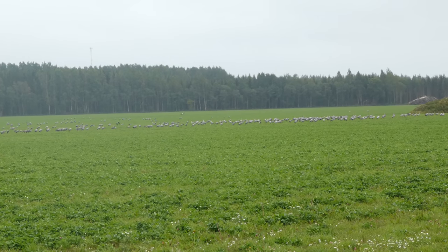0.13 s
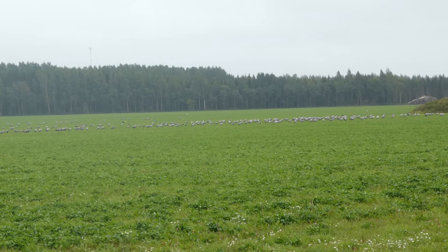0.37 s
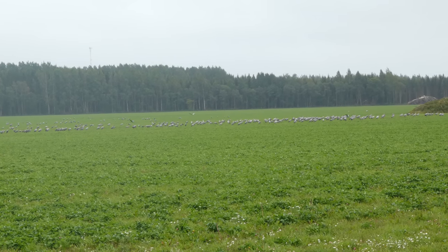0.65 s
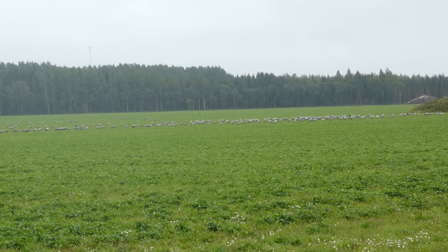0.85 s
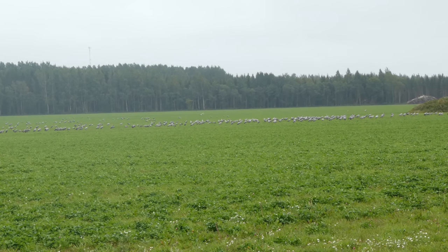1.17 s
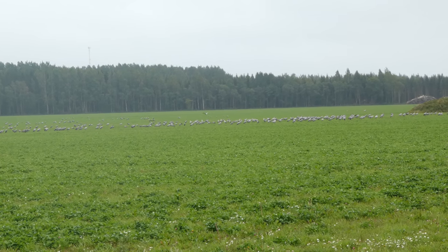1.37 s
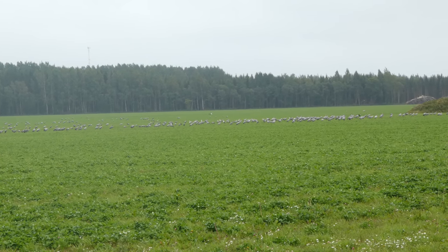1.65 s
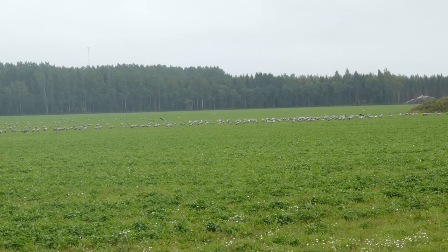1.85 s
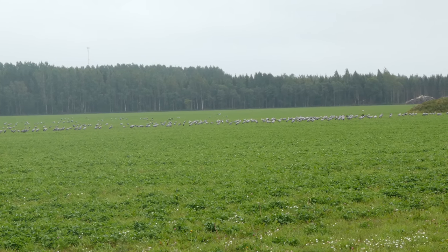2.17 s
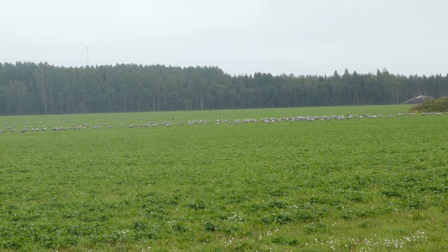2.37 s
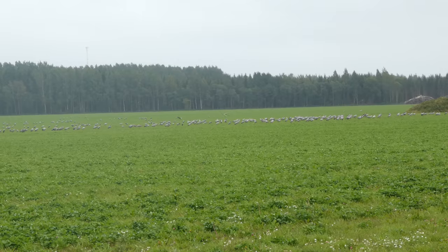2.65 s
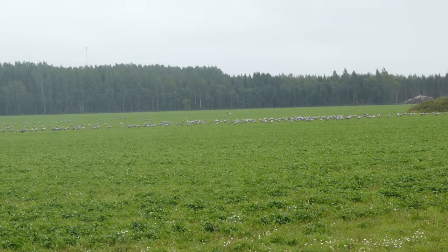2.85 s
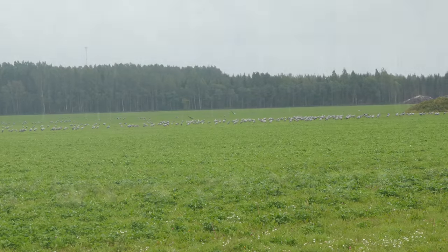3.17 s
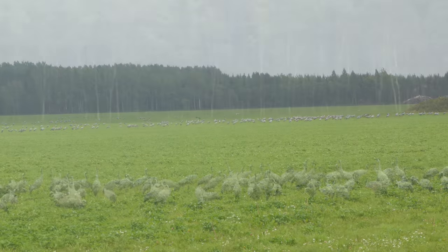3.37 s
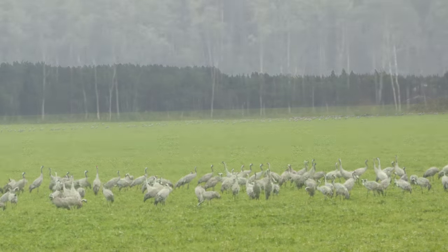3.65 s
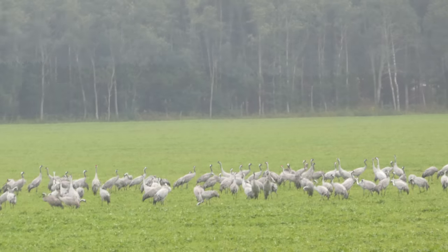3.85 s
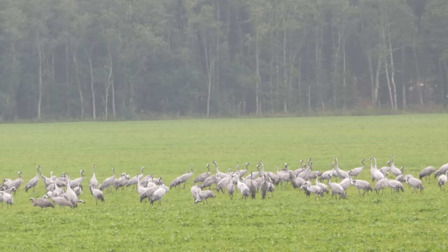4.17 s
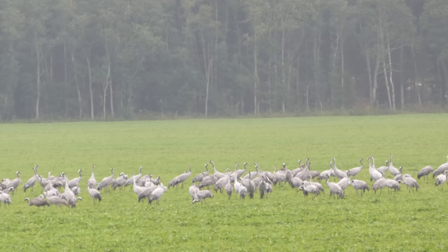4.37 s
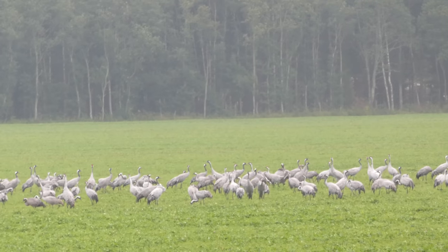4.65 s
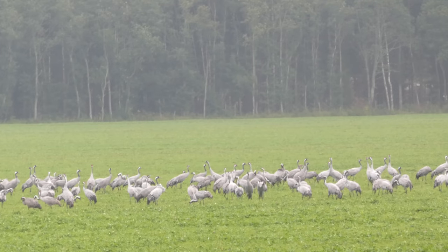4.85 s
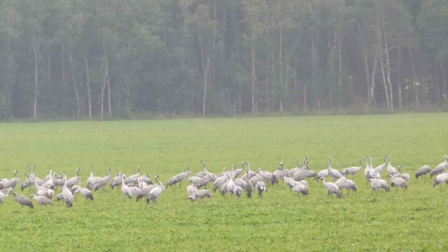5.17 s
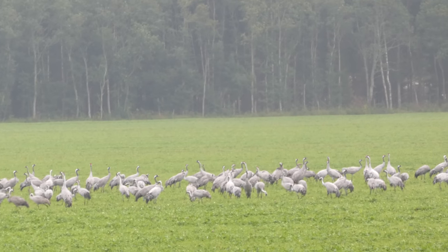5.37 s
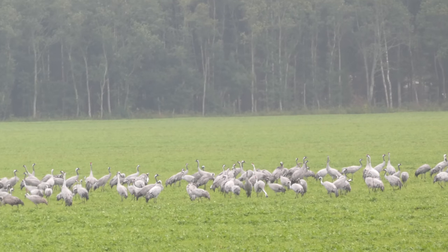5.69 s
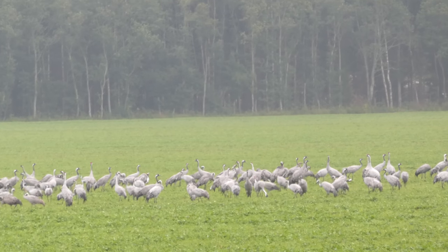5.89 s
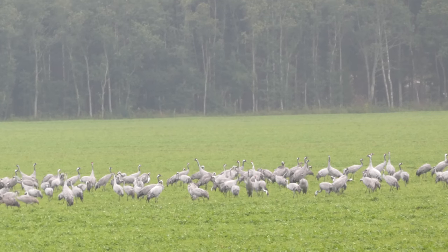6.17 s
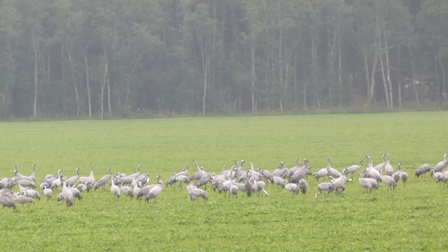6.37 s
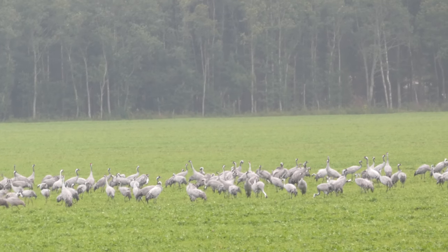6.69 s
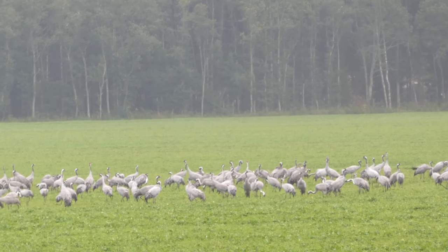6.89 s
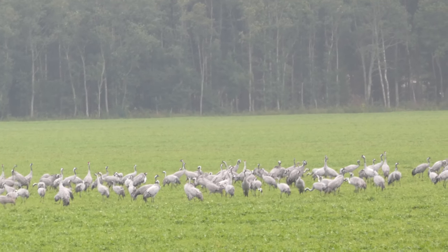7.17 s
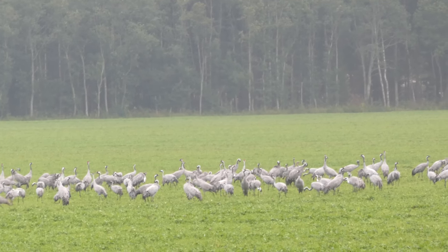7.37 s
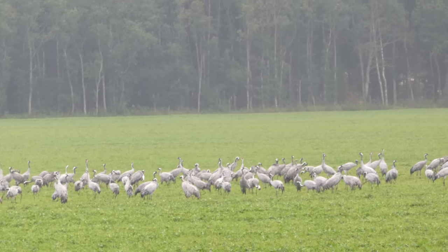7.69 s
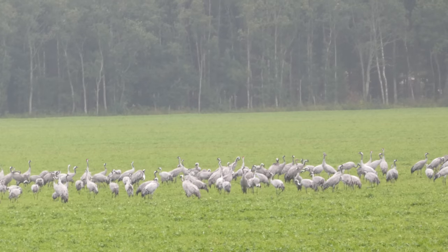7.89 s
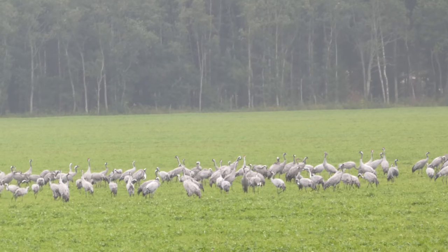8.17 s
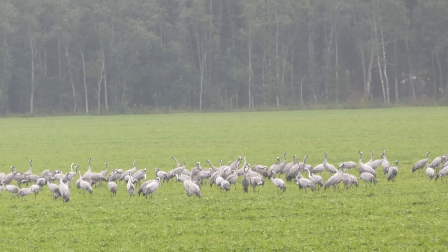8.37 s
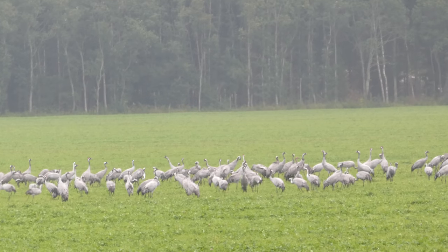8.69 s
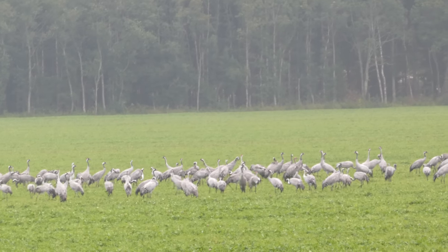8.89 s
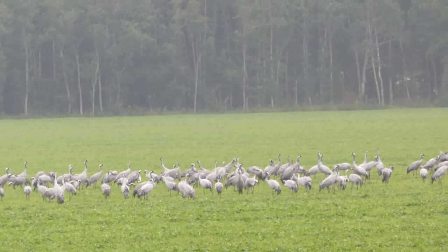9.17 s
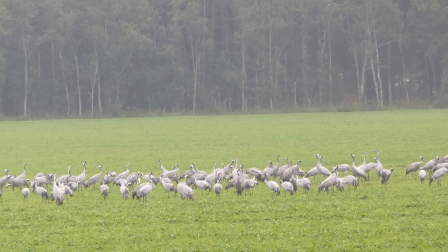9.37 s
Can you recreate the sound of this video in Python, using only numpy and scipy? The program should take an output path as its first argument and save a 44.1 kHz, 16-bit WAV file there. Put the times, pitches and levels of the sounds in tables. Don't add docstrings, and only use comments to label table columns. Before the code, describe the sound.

A large crane flock calls throughout in an open field, with hoarse distant voices merging into a murmur that rises and falls in waves, and a soft forest echo behind. From about 0.5 to 1.8 seconds nearby adults roll loudly, around 21 beats a second near 1 kHz, with hollow knocks near 0.7 and a bright trumpet call at 1.7. A rattle opens into calls around 2.3 to 3, with a high juvenile whistle at 2.6. Low wind thumps hit the microphone from 2.5 and are heaviest from 3.4 to 4.9, partly covering softer honks. Nasal and brassy calls cluster at 5.2 to 6, with a pure trumpet note at 6 and chirps to 6.5. Light gusts return at 6.6 and intermittently afterwards. Scattered rasping, round calls and thin whistles continue, including rolls at 8.4 and a strong ringing bugle near 9.1, over steady faint hiss until the end.

```python
import sys
import numpy as np
from scipy import signal
from scipy.fft import rfft, irfft, next_fast_len
from scipy.io import wavfile
from scipy.ndimage import uniform_filter1d, map_coordinates

SR = 44100
rng = np.random.default_rng(int(sys.argv[2]) if len(sys.argv) > 2 else 0)


def log_audio(samples):
    frames = np.atleast_2d(samples).T
    limited = np.clip(frames, -1, 1)
    pcm = np.round(limited * 32767).astype(np.int16)
    wavfile.write(sys.argv[1], SR, pcm)


def attenuation_scalar(level_db):
    decades = np.asarray(level_db, float) / 20
    return 10 ** decades


N = 420713


def unit(x):
    return x / np.sqrt(np.mean(x ** 2) + 1e-20)


def along(points, hz):
    f, value = np.transpose(points)
    return np.interp(np.log(hz + 1), np.log(f + 1), value)


def wobble(rate, size, order=3):
    knots = rng.standard_normal(int(size * rate / SR) + 4)
    return map_coordinates(knots, [np.arange(size) * rate / SR], order=order)


def noise(spectrum, channels):
    m = next_fast_len(N)
    gain = attenuation_scalar(along(spectrum, np.fft.rfftfreq(m, 1 / SR)))
    white = rng.standard_normal((channels, m))
    return unit(irfft(rfft(white) * gain, m)[:, :N])


def add(track, s, x):
    part = track[..., round(s * SR):round(s * SR) + x.shape[-1]]
    part += x[..., :part.shape[-1]]


def placed(x, pan_db):
    return x * attenuation_scalar([[pan_db / 2], [-pan_db / 2]])


# [f/Hz, level/dB per Hz]
HISS = [(59, -16), (100, -6.5), (333, -5), (696, -8), (860, 1), (1620, -2.5), (1800, -9), (4180, -11),
        (5390, -19), (10400, -18.5), (15500, -29)]
# [f/Hz, level/dB]
HISS_SIDE = [(100, -0.5), (300, -0.5), (1000, -10.5), (4000, -17), (8000, -18.5), (15000, -14)]


def hiss():
    mid = noise(HISS, channels=1)[0]
    side = noise([(hz, db + along(HISS_SIDE, hz)) for hz, db in HISS], channels=1)[0]
    sag_db = -2.5 * np.exp(-((np.arange(N) / SR - 3.5) / 0.31) ** 2)
    return attenuation_scalar(-61.0 + sag_db) * (mid + attenuation_scalar(3.0) * side * [[1], [-1]])


# [t/s, length/s, peak level/dB]
GUSTS = [(0.774, .1, -49), (1.09, .13, -52), (3.345, .02, -50), (2.41, .03, -50), (5.302, .25, -58.5),
         (6.2, .15, -58), (6.7, .1, -49.5), (6.89, .06, -47), (7.27, .06, -50.5), (7.75, .08, -56),
         (8.071, .04, -45), (8.46, .08, -46), (9.0, .12, -57), (9.349, .08, -52), (5.6, .2, -63)]
EDDY_S, EDDY_HZ = 0.055, 120
EDDY_SCATTER_DB, EDDY_CORE_DB = 4, -31


def eddies():
    shed = []
    for s, length, db in GUSTS:
        for k in range(1 + int(length / EDDY_S)):
            level_db = db - EDDY_SCATTER_DB * rng.exponential()
            shed.append((s + EDDY_S * k, level_db, EDDY_HZ * rng.uniform(0.64, 1.45), EDDY_CORE_DB))
    return shed


# [centre t/s, peak level/dB, f/Hz, sharp core level/dB]
PUFFS = [(1.051, -43, 165, -27), (2.473, -37.5, 174, -24), (2.512, -28.5, 124, -29), (2.555, -35, 194, -25),
         (2.586, -51, 182, -14), (2.637, -30.5, 148, -19), (2.698, -36.5, 164, -17), (2.804, -41, 140, -16),
         (3.417, -37.1, 170, -16), (3.461, -32, 203, -11), (3.501, -41, 129, -25), (3.607, -43.5, 149, -15),
         (3.633, -33.5, 160, -23), (3.665, -50, 146, -15), (3.809, -33, 132, -10), (3.838, -44.2, 182, -12),
         (3.867, -32.6, 167, -28), (3.903, -43, 172, -20), (3.939, -34.5, 133, -22), (3.976, -31, 175, -12),
         (4.001, -22.5, 171, -14), (4.027, -34, 170, -17), (4.051, -38, 149, -19), (4.11, -40, 128, -21),
         (4.145, -37.5, 149, -20), (4.17, -39, 178, -22), (4.192, -52, 149, -18), (4.228, -28, 188, -4),
         (4.285, -31, 161, -18), (4.313, -35, 152, -23), (4.371, -47, 172, -17), (4.394, -30.5, 190, -25),
         (4.419, -41.6, 149, -11), (4.447, -28.5, 181, 0.5), (4.52, -34, 162, -12),
         (4.682, -41.5, 154, -17), (4.768, -42.5, 132, -16), (4.81, -34, 139, -24),
         (4.838, -44.0, 119, -19), (4.868, -41, 137, -24), (4.959, -46.5, 122, -16), (6.474, -48, 118, -23),
         (6.605, -44, 163, -23), (6.642, -32, 161, -26), (6.818, -50, 128, -15), (6.856, -41.5, 136, -23),
         (7.238, -43, 127, -20), (7.444, -45.5, 140, -18), (8.348, -39, 130, -29)]
# [f/Hz, level/dB per Hz]
RUMBLE = [(25, -23), (45, -38), (70, -3), (130, 1), (220, -4), (400, -17.5), (800, -71)]
CALM_LUMPS = 0.4


def wind():
    thumps, force = np.zeros((2, N)), np.zeros(N)
    t = np.arange(-SR // 12, SR // 12) / SR
    for s, db, hz, core_db in list(PUFFS) + eddies():
        turn = rng.uniform(0, 2 * np.pi) + rng.normal(0, 0.52, (2, 2, 1))
        body = np.exp(-(t * hz / 0.77) ** 2) * np.sin(2 * np.pi * hz * t + turn[0])
        core = np.exp(-(t / 0.0021) ** 2) * np.sin(2 * np.pi * 470 * t + 3 * turn[1])
        puff = attenuation_scalar(db) * (body + attenuation_scalar(core_db + 0.5) * core)
        add(thumps, s + t[0], placed(puff, rng.normal(1.0, 1)))
        add(force, s + t[0], attenuation_scalar(db) * np.exp(-(t / 0.036) ** 2))
    shared, *own = noise(RUMBLE, channels=3)
    air = unit(shared + .5 * np.array(own))
    lumps = attenuation_scalar(6.4 * wobble(25, N))
    calm = attenuation_scalar(-78.5 + 0.71 * wobble(8.1, N))
    return thumps + (attenuation_scalar(-14.5) * force * unit(lumps) + calm * unit(lumps ** CALM_LUMPS)) * air


# [f/Hz, t60/s]
FOREST = [(600, 0.43), (2500, 0.18), (7000, 0.29)]


def forest(x):
    hz, t, z = signal.stft(rng.standard_normal((2, SR * 3 // 4)), SR, nperseg=256)
    decay = attenuation_scalar(-60 * t / along(FOREST, hz)[:, None])
    tail = signal.istft(z * decay, SR, nperseg=256)[1]
    late = np.pad(x.mean(0), (500, 0))[None]
    return signal.fftconvolve(late, tail / np.linalg.norm(tail[0]), axes=1)[:, :N]


def rolled(size, rate, depth_db):
    turns = np.cumsum(rate * (1 + 0.0916 * wobble(12.2, size))) / SR
    beat = (turns + rng.random()) % 1
    fall = attenuation_scalar(depth_db * (0.88 - beat))
    opening = attenuation_scalar(-depth_db * np.clip(1 - beat / 0.072, 0, 1))
    return beat, fall * opening


def throat(hz, gain, overtones_db, rough):
    size = len(hz)
    jitter = (0.0027 + 0.01168 * rough) * wobble(90.5, size)
    phase = 2 * np.pi * np.cumsum(hz * (1 + jitter)) / SR + 2 * np.pi * rng.random()
    gain = np.sqrt(2) * gain * attenuation_scalar((1.19 + 3.1 * min(rough, .3)) * wobble(41.7, size))
    parts = []
    for k, db in enumerate((0, *overtones_db), start=1):
        share = np.clip(rough * (.35 * k - .1), 0, 1)
        flutter = np.sqrt(1 - share) + np.sqrt(share) * wobble(130 + 110 * k, size, order=1)
        parts.append(attenuation_scalar(db) * flutter * np.sin(k * phase + k * k))
    return gain * np.array([parts[0], parts[1], sum(parts[2:])])


# [t/s, length/s, level/dB, higher harmonics re level/dB]
WAVES = [(0, 0.017, -59, 2.5), (0.468, .14, -66.5, 17), (0.61, 0.18, -47.5, -11),
         (0.834, 0.69, -57.5, -1.5), (1.19, 0.18, -55, -1), (1.477, 0.14, -51.5, -5),
         (1.74, 0.28, -56.5, -2), (2.245, 0.24, -50, -5), (2.703, 0.35, -69, 7.5), (3.18, 0.34, -56.5, -5),
         (3.688, 0.53, -54, -8), (4.197, 0.15, -56.5, -1.5), (4.44, 0.2, -53.5, -9),
         (4.86, .48, -55.5, -3.5), (5.567, 0.48, -52.5, -6), (6.21, 0.5, -55.5, -2.5),
         (6.55, 0.46, -64.5, -17), (6.782, 0.75, -52, -5), (7.473, 0.72, -56.5, -2.5),
         (7.8, 0.2, -53.5, -8), (8.35, 0.24, -55.5, -6), (8.856, 0.22, -51, -7.5), (9.15, 0.2, -53.5, -6.5),
         (9.48, .2, -50, -5)]
WAVE_RISE_DB_PER_S, WAVE_FALL_DB_PER_S, LULL_DB = 112, 138, -73


def waves():
    t = np.arange(0, N / SR + .01, .005)
    s, length, db, rasp_db = np.transpose(WAVES)[..., None]
    before_db = WAVE_RISE_DB_PER_S * np.maximum(s - t, 0)
    after_db = WAVE_FALL_DB_PER_S * np.maximum(t - s - length, 0)
    power = attenuation_scalar(2 * (db - before_db - after_db))
    total = power.sum(0) + attenuation_scalar(2 * LULL_DB)
    now = np.arange(N) / SR
    level_db = np.interp(now, t, 10 * np.log10(total))
    return level_db, np.interp(now, t, (power * rasp_db).sum(0) / total)


WINDPIPE = [-4, -1.5, -4, -7.5, -14.5]


def murmur(count=250):
    layers = np.zeros((3, 2, N))
    for turn, (when, length, pitch, size, roll, pan) in enumerate(rng.random((count, 6))):
        u = np.linspace(0, 1, round(SR * (.1 + .22 * length)))
        beat, flap = rolled(len(u), 18 + 9 * pan, depth_db=4 + 13 * roll ** 2)
        arch = .02 * np.sin(np.pi * u) - 0.05334 * u ** 4
        snap = 0.0602 * roll * np.exp(-beat / 0.2507)
        hz = (770 + 400 * pitch ** 1.3) * (1 + arch + snap)
        gain = np.sin(np.pi * u) ** 0.027 * attenuation_scalar(4.3 * size) * flap
        overtones_db = WINDPIPE + rng.normal(0, 3, len(WINDPIPE))
        voice = throat(hz, gain, overtones_db, rough=.33 + .65 * roll ** 2)
        start = (turn + 2 * when) / count * N / SR * (count / (count + 1))
        add(layers, start, voice[:, None] * attenuation_scalar(8.9 * (pan - 0.56) * np.array([[1], [-1]])))
    level_db, rasp_db = waves()
    power = uniform_filter1d(np.mean(layers ** 2, 1), SR // 8)
    low, second, rasp = layers / np.sqrt(np.abs(power) + 1e-2)[:, None]
    return attenuation_scalar(level_db) * (low + attenuation_scalar(-3.5 + 0.2 * rasp_db) * second + attenuation_scalar(rasp_db) * rasp)


def sung(notes, fade):
    out = np.zeros((2, N))
    for rough, overtones_db, rows in notes:
        s, hz, db = np.transpose(rows)
        t = np.arange(max(s[0] - fade, 0), s[-1] + fade, 1 / SR)
        edge = np.clip(np.minimum(t - t[0], t[-1] - t) / (1.05 * fade), 0, 1) ** 2
        edge = edge * rolled(len(t), 22, depth_db=25.0 * max(rough - .2, 0))[1]
        pitch = uniform_filter1d(np.interp(t, s, hz), SR // 50, mode="nearest")
        gain = edge * attenuation_scalar(np.interp(t, s, db))
        voice = throat(pitch, gain, overtones_db, np.clip(rough, 0, 1))
        add(out, t[0], placed(voice.sum(0), rng.normal(-.4, 1.2)))
    return out


# [t/s, length/s, first f/Hz, crest f/Hz, last f/Hz]
NEAR_YOUNG = [
    (2.62, 0.3, 3070, 4180, 3300),
    (6.355, 0.1, 4050, 4760, 4790),
    (6.505, 0.03, 4860, 4870, 4700),
    (6.02, 0.09, 4850, 4870, 4700),
    (4.02, .045, 4800, 4870, 4830),
]
FAR_YOUNG = [
    (3.61, .125, 3980, 3990, 3450),
    (3.43, .05, 3200, 3500, 3490),
    (5.21, .17, 4270, 5020, 4620),
    (7.635, .205, 3700, 4980, 3850),
    (2.33, .035, 5250, 5500, 5450),
    (8.96, .24, 4850, 5150, 4900),
    (8.964, 0.075, 5650, 5880, 5870),
]
FAINT_YOUNG = [
    (.2, .16, 4100, 4550, 4540),
    (.37, .07, 4750, 4760, 4300),
    (2.62, .15, 4600, 4950, 4300),
    (8.82, .11, 3800, 4900, 4890),
    (4.065, .06, 5450, 5520, 5480),
    (3.965, .06, 3800, 4800, 4790),
    (3.49, .09, 3700, 4450, 4300),
    (9.22, .06, 4950, 4960, 4700),
    (2.02, .09, 4300, 4450, 4200),
]
NEAR_YOUNG_DB, FAR_YOUNG_DB, FAINT_YOUNG_DB = -57, -61, -70
NEAR_BREAK, FAR_BREAK = .3, .55
YOUNG_SWELL_DB, FALL_HASTE = 11.5, 1.5


def whistles():
    u, notes = np.linspace(0, 1, 15), []
    for db, rough, calls in ((NEAR_YOUNG_DB, NEAR_BREAK, NEAR_YOUNG), (FAR_YOUNG_DB, NEAR_BREAK, FAR_YOUNG),
                             (FAINT_YOUNG_DB, FAR_BREAK, FAINT_YOUNG)):
        for s, length, first_hz, crest_hz, last_hz in calls:
            up = np.sqrt(abs(crest_hz - first_hz) + 1)
            down = np.sqrt(abs(crest_hz - last_hz) + 1)
            crest = up / (up + down / FALL_HASTE)
            drop = np.where(u < crest, up * (1 - u / crest), down * (u - crest) / (1 - crest))
            level_db = db - YOUNG_SWELL_DB * (1 - u) ** 2 - 3 * u ** 6
            rows = np.transpose([s + length * u, crest_hz - drop ** 2, level_db])
            notes.append((rough, (-35, -50), rows))
    return sung(notes, fade=0.0064)


# [t/s, peak level/dB, f/Hz, 2nd harmonic level/dB]
BEATS = [(0.553, -36, 871, -30), (0.588, -34, 954, -24), (0.612, -37.5, 939, -24),
         (0.645, -32.5, 1023, -30), (0.778, -42, 1020, -41), (0.944, -35.5, 970, -41),
         (0.991, -30, 997, -31), (1.038, -31.5, 1022, -40), (1.082, -30.5, 1016, -37),
         (1.127, -32.5, 976, -30), (1.29, -35.5, 1043, -35), (1.343, -36, 1030, -40), (1.6, -40, 1000, -27),
         (1.638, -38, 1059, -24), (1.67, -35.5, 1067, -23), (1.711, -36, 1070, -23),
         (1.752, -40, 1138, -23), (2.807, -41.5, 1054, -25), (2.856, -36.5, 1025, -18),
         (2.906, -35.5, 1068, -18.5), (2.961, -36, 1067, -16.5), (5.956, -37, 1158, -45),
         (6.865, -40, 874, -35), (8.401, -37.5, 952, -37), (8.445, -41, 972, -31), (8.48, -35.5, 990, -45),
         (8.516, -35, 1032, -47), (8.737, -44, 934, -26)]
# [t/s, peak level/dB, f/Hz]
RATTLE = [(.003, -50, 1078), (1.175, -54, 1074), (1.215, -51, 851), (1.257, -45.5, 865), (5.125, -43, 950),
          (5.22, -51, 950), (5.18, -49, 950), (2.285, -52, 1095), (2.345, -44, 1074), (2.381, -42, 785),
          (2.422, -41.5, 876), (2.466, -41, 876), (4.001, -60, 1090), (4.216, -47.5, 825),
          (6.646, -63, 1076), (6.699, -54, 1067), (6.836, -56, 855), (6.884, -50, 1050), (7.921, -60, 1090),
          (8.791, -51, 1003)]
RATTLE_TIMBRE = (-21, -17.5, -20, -28.5, -34, -34.5)
# [t/s, peak level/dB, f/Hz]
HARSH = [(1.16, -66, 1010), (1.2, -58, 840), (1.235, -53, 830), (1.272, -52, 800), (1.305, -57, 800),
         (1.376, -64, 1000), (2.301, -60, 788), (2.325, -61, 1056), (2.4, -53, 800), (2.44, -63, 786),
         (2.483, -67, 795), (5.035, -60, 797), (5.145, -60, 795), (6.86, -63, 804), (6.89, -56, 796),
         (6.565, -55, 725)]
HARSH_TIMBRE = (-21, -22, -6.5, -8, -18.5, -22)
# [t/s, peak level/dB, f/Hz]
HOLLOW = [
    (.689, -26, 1120),
    (.733, -27.5, 1110),
    (.718, -36, 900),
]
HOLLOW_TIMBRE = (-48, -33.5, -52, -54, -62)
HEAD_SHARP, HEAD_S = 0.1074, 0.01083


def beats():
    out, t = np.zeros((2, N)), np.arange(SR // 16) / SR
    snap = (1 - np.exp(-t / .0015)) * (.6 + np.exp(-t / .009))
    shape = snap / (1 + (t / .037) ** 8)
    rolls = [(s, db, hz, second_db - 9 * np.arange(5), .2) for s, db, hz, second_db in BEATS]
    for rows, timbre, rough in ((RATTLE, RATTLE_TIMBRE, .3), (HARSH, HARSH_TIMBRE, .6),
                                (HOLLOW, HOLLOW_TIMBRE, .2)):
        rolls += [(*row, timbre, rough) for row in rows]
    for s, db, hz, overtones_db, rough in rolls:
        pitch = hz * (1 + HEAD_SHARP / (1 + (t / HEAD_S) ** 4))
        low, *high = throat(pitch, attenuation_scalar(db - 10) * shape, overtones_db, rough)
        bright = attenuation_scalar(20.0) * sum(high) * np.exp(-t / 0.025)
        add(out, s - .002, placed(low + bright, rng.normal(-0.44, 0.6)))
    return out


MANNER = {"round": (0.077, 0.01856, 0.102, 5.6, 9.7), "ringing": (0.1, 0.01415, 0.069, 7.2, 10.4),
          "brassy": (0.17, 0.0358, 0.11, 10.5, 12), "hoarse": (0.6, 0.0598, 0.0381, 6.4, 4.8),
          "nasal": (0.2, 0.02055, 0.04, 11.8, 4.6), "shrill": (0.12, 0.0038, 0.0743, 3.3, 8.1),
          "rasping": (0.38, 0.0298, 0.0403, 8.9, 8.5), "reedy": (0.15, 0.0304, 0.019, 4.4, 3.8),
          "clarion": (0.084, .06, .14, 2.7, 3)}
TIMBRE = {"round": (-1, -11, -19, -26, -29, -53), "ringing": (-3.5, -13.5, -12.5, -17, -16, -29),
          "brassy": (1, 3.5, 0, -6, -25, -29), "hoarse": (-2.5, -14.5, -45, -36, -41, -48),
          "nasal": (5, 1.5, -4.5, -10, -16, -31), "shrill": (6, 1.5, 4, 4.5, -5, -1.5),
          "rasping": (-3, 8, 6, -7.5, -14, -6.5), "reedy": (2, 2.5, -28, -14, -21, -30),
          "clarion": (-2, -15.5, -26, -37, -39, -50)}
# [t/s, length/s, f/Hz, level/dB, overtones level/dB]
ROUND = [
    (2.03, 0.093, 881, -53.5, -19),
    (2.427, 0.14, 1218, -63.5, 15),
    (2.974, 0.081, 1070, -43, -4.5),
    (3.172, 0.24, 886, -60.5, -1),
    (3.407, 0.068, 1025, -70, 8),
    (4.397, 0.082, 1046, -43, -29),
    (7.023, 0.18, 1040, -50.5, 0.5),
    (7.171, 0.22, 995, -55, 5.5),
    (8.072, 0.29, 1089, -53.5, 4),
]
RINGING = [
    (1.925, .27, 928, -48, 2),
    (1.408, 0.062, 825, -58, 12.5),
    (4.58, 0.097, 870, -61, 2),
    (9.063, 0.15, 1005, -45, -5.5),
    (9.392, 0.099, 920, -59, 8.5),
]
BRASSY = [
    (3.76, 0.3, 815, -60.5, -5),
    (6.51, .105, 751, -61, 6),
    (4.215, 0.2, 791, -57.5, 0.5),
    (4.95, 0.25, 821, -63, -2),
    (5.2, .18, 803, -62, -5),
    (5.229, 0.12, 1002, -54, -7.5),
    (5.9, 0.11, 925, -54.5, -3),
    (8.954, 0.093, 921, -52, -3),
]
HOARSE = [(0, 0.092, 1015, -64, 3), (1.162, 0.19, 830, -54, -7), (1.7, 0.17, 1108, -51.5, 3.5),
          (0.9, 0.129, 800, -53.5, -7), (9, 0.201, 800, -56, -9), (5, 0.161, 810, -56.5, -9),
          (8, .2, 760, -59, 0), (2.5, 0.201, 760, -56, -1.5), (3.165, 0.238, 983, -51.5, -9.5),
          (4, 0.35, 1100, -64.5, 6), (5.5, 0.31, 1000, -61.5, 2), (7, 0.095, 1110, -47, -0.5),
          (7.363, 0.27, 1142, -59, 0.5)]
NASAL = [(0.442, 0.114, 825, -50.5, -0.5), (.57, .17, 822, -48, -8.5), (5.56, 0.16, 840, -51, -11),
         (5.69, 0.13, 840.5, -47, -7), (5.632, 0.12, 989, -51, -9), (5.721, .14, 1115, -54.5, -9),
         (4.88, 0.16, 1130, -64, -10), (5.749, 0.18, 765, -63, 1.5), (6.86, .2, 819, -57.5, -7),
         (7.796, 0.11, 1002, -64, 6.5), (7.856, 0.12, 1093, -51.5, -6.5)]
SHRILL = [
    (2.496, 0.0757, 780, -49.5, -3),
    (6.041, 0.13, 780, -62.5, -3),
    (9.016, 0.053, 780, -65, -4),
    (5.25, .14, 790, -65.5, -2),
    (1.85, .075, 830, -61.5, -1.5),
    (9.0, .09, 1060, -69, -4),
]
RASPING = [
    (2.248, 0.12, 1044, -50, -17),
    (4.04, 0.13, 774, -54.5, -3.5),
    (5.798, 0.13, 1077, -64, -4),
    (6.26, 0.13, 938, -56.5, -9.5),
    (7.395, 0.086, 1016, -60, -5.5),
    (9.319, 0.091, 778, -62.5, -2),
]
ENDINGS = [
    (.75, 0.062, 1000, -39.5, -24),
    (1, 0.051, 970, -49, -15),
    (1.355, 0.046, 940, -43, -21),
    (0.18, 0.092, 890, -75, -2),
    (.35, 0.055, 1400, -65, -18),
    (.085, 0.042, 1200, -63, 7),
    (.605, 0.0595, 1200, -42, -16),
    (.825, 0.079, 1100, -55, 4),
    (9.15, 0.058, 880, -50, -11),
    (9.05, .14, 1005, -57, 7.5),
]
REEDY = [
    (4.82, .29, 1087, -59, 0),
    (6.335, .085, 1062, -58, 0),
    (0, 0.056, 1110, -57.5, -4),
    (5.5, 0.144, 730, -63.5, -2),
    (5.12, .12, 1070, -62, -2),
    (7.5, .17, 1130, -58, -2),
    (4.55, .13, 1170, -57, -6),
]
CLARION = [
    (3.415, .08, 1130, -64, 7),
    (3.415, .08, 985, -61, 7),
    (6.005, .105, 1220, -45, -22),
    (1.735, .255, 1166, -42, 0),
    (3.2, .14, 1160, -60, 3),
    (8.545, .14, 1075, -46, -17),
]
OPEN_S, CLOSE_S = 0.04954, 0.03386
DROP_S = 0.0178


def bugles():
    notes = []
    for kind, calls in (("round", ROUND), ("ringing", RINGING), ("brassy", BRASSY), ("hoarse", HOARSE),
                        ("nasal", NASAL), ("shrill", SHRILL), ("rasping", RASPING), ("round", ENDINGS),
                        ("reedy", REEDY), ("clarion", CLARION)):
        rough, rise, sag, swell_db, fade_db = MANNER[kind]
        close_s = DROP_S if kind == "clarion" else CLOSE_S
        for s, length, hz, db, open_db in calls:
            t = np.linspace(0, length, 25)
            early, late = np.exp(-t / OPEN_S), np.exp((t - length) / close_s)
            pitch = hz * (1 - rise * early - sag * late)
            level_db = db - swell_db * early - fade_db * late
            notes.append((rough, np.add(TIMBRE[kind], open_db), np.transpose([s + t, pitch, level_db])))
    return sung(notes, fade=.018)


def scene():
    gusts, floor, far = wind(), hiss(), murmur()
    near = beats() + bugles() + whistles()
    breath_db = .6 * (wobble(6.5, N) + wobble(18, N))
    answer = forest(attenuation_scalar(-12.5) * near + attenuation_scalar(-17.5) * far)
    return near + far + answer + gusts + floor * attenuation_scalar(breath_db)


def low_pass(x):
    return signal.sosfilt(signal.butter(12, 15610, fs=SR, output="sos"), x)


def record(dry):
    m = next_fast_len(N)
    in_band = np.fft.rfftfreq(m, 1 / SR) < 15650
    mix = irfft(rfft(dry, m) * in_band, m)[:, :N]
    return low_pass(mix)


dry = scene()
out = record(dry)
log_audio(out)
```